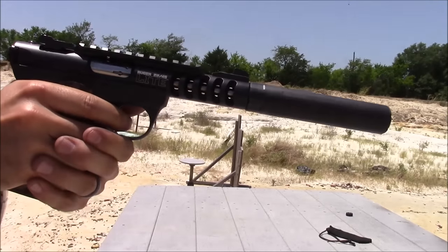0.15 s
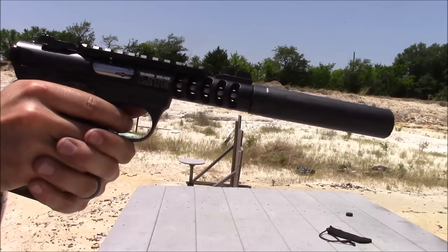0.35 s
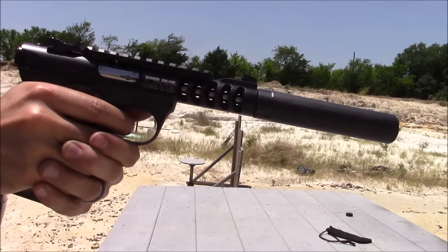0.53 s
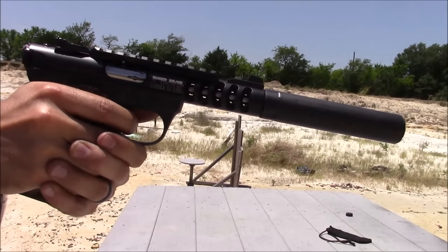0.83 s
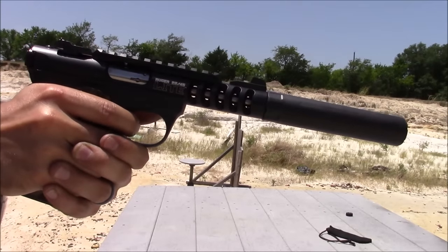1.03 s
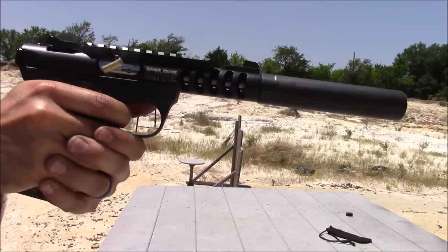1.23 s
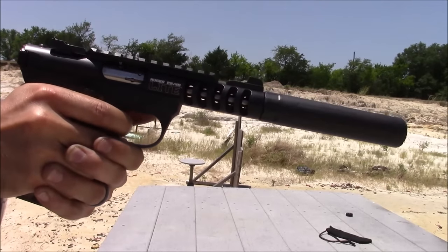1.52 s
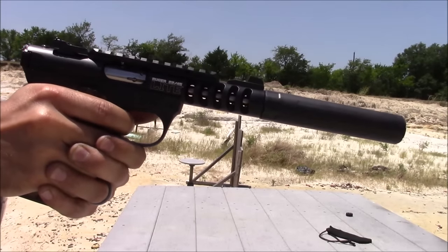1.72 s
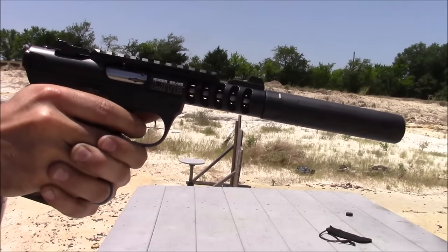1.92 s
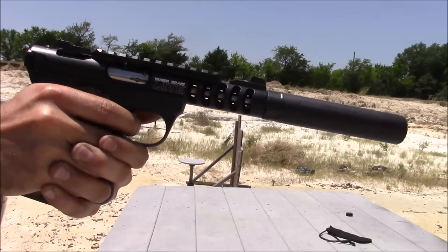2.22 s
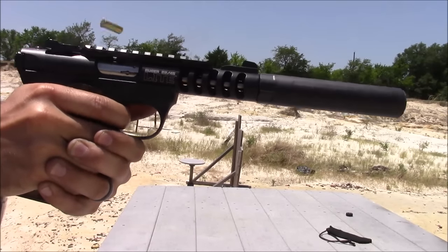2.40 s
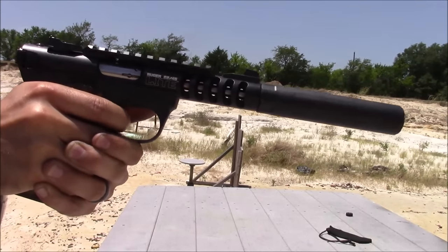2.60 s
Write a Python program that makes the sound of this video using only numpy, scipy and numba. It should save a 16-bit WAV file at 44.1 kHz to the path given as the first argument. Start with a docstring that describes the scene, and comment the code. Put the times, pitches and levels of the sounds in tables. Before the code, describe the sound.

Two suppressed pistol shots about a second apart, each a short muffled crack with metallic bolt clacks, gas hiss and dull echo; cases tick and knock on a wooden bench, wind rumbling on a close microphone.

```python
"""Two muffled pistol shots crack and thump on a windy outdoor range, beside a camera.
Each is a hammer click, a noise blast with low sines, sputtering gas hiss and an echo off the banks.
The bolt's clacks and the spent cases ticking on a wooden bench are struck sets of decaying modes.
One case knocks the camera, a falling wobble and a low thud; scrapes are bursts of resonant noise.
Wind rumble, far and microphone hiss, faint insects and a brief rustle are filtered noise."""
import sys
import numpy as np
from scipy import signal
from scipy.fft import rfft, irfft
from scipy.io import wavfile
from scipy.ndimage import uniform_filter1d
from numba import njit

SR = 44100
rng = np.random.default_rng(int(sys.argv[2]) if len(sys.argv) > 2 else 0)


def makeup_ratio(level_db):
    """Linear amplitude ratio for a level in decibels (20 dB per factor of ten)."""
    decades = np.asarray(level_db, float) / 20
    return 10 ** decades


def file_out(sig):
    """Save sig as 16-bit WAV at sys.argv[1]."""
    # one column per channel
    cols = np.atleast_2d(sig).T
    # limit, then scale
    lim = np.clip(cols, -1, 1)
    pcm = np.round(lim * 32767).astype(np.int16)
    wavfile.write(sys.argv[1], SR, pcm)


N = 121275  # samples, 2.75 s


def colour(x, points):
    """Linear filtering: weight the spectrum of x by (Hz, dB) points joined on a log axis."""
    hz = np.fft.rfftfreq(len(x), 1 / SR) + 1
    points = np.array(points, float)
    gain_db = np.interp(np.log(hz), np.log(points[:, 0]), points[:, 1])
    return irfft(rfft(x) * makeup_ratio(gain_db), len(x))


def noise(points, size):
    """Spectral shaping: white noise filtered to the points and scaled to rms 1."""
    y = colour(rng.standard_normal(size), points)
    return y / np.sqrt(np.mean(y ** 2))


def fade(t, t60):
    """Exponential decay: silent before 0, then 60 dB down every t60 seconds."""
    return (t >= 0) * np.exp(-np.log(1000) * np.maximum(t, 0) / t60)


def add(out, start_s, x):
    """Superposition: mix x into out at start_s."""
    i = int(round(start_s * SR))
    out[i:i + len(x)] += x[:len(out) - i]


def walk(rate):
    """Slow random modulation: levels held 1 / rate s, then smoothed twice; spread near 1."""
    k = int(SR / rate)
    steps = np.repeat(rng.standard_normal(N // k + 1), k)
    return 1.3 * uniform_filter1d(uniform_filter1d(steps, k), k)[:N]


def curve(rows):
    """Amplitude envelope: (s, dB) rows as a gain per sample."""
    return makeup_ratio(np.interp(np.arange(N) / SR, *np.array(rows, float).T))


# Blast spectrum. Each row: frequency in Hz, density in dB per Hz.
BLAST_SPECTRUM = [(290, -19), (500, -3.5), (1320, -9), (2770, -3), (5390, -10), (6610, -7.5), (7980, -15),
                  (13100, -17.5), (16000, -33)]


def muffled_blast(t):
    """Impulsive release: broadband noise held, then decaying, with a tail of sputtering gas."""
    hold_s, t60_s = .004, .04
    gas_db, gas_t60_s = -9, .17
    gas = makeup_ratio(gas_db + 3 * walk(600)[:len(t)]) * fade(t, gas_t60_s)
    body = fade(t - hold_s, t60_s) + (t < hold_s) + gas
    return noise(BLAST_SPECTRUM, len(t)) * body


# Echo spectrum. Each row: frequency in Hz, density in dB per Hz.
ECHO_SPECTRUM = [(88, 8), (150, -7.5), (286, 0.5), (457, -9), (1340, -9.5), (1630, -12), (2700, -8),
                 (8400, -20.5), (16000, -31.5)]


def range_echo(t):
    """Reverberant decay: the treble dies sooner than the bass, so the echo dulls."""
    low_t60_s, high_t60_s = 0.94, 0.55
    echo = noise(ECHO_SPECTRUM, len(t))
    low = colour(echo, [(700, -1), (4000, -61)])
    decaying = low * fade(t, low_t60_s) + (echo - low) * fade(t, high_t60_s)
    return makeup_ratio(3.27 * walk(90)[:len(t)]) * decaying


# The two shots. Each row: start in seconds, blast level in dB before halving, thump level in dB,
# thump frequency in Hz, level of the 330 Hz punch in dB above the thump, echo level in dB.
SHOT_ROWS = [(1.2945, -1, -1, 170, 0, -15), (2.474, -2, 0, 140, -12, -15)]


def shots():
    """Superposition of a shot's parts: hammer fall, blast with gas, low thump and echo."""
    hammer_lead_s, hammer_db, hammer_t60_s = .0045, -17, .05
    thump_lag_s, thump_t60_s, punch_hz = .001, .04, 330
    out, t = np.zeros(N), np.arange(SR) / SR
    for s, blast_db, thump_db, thump_hz, punch_db, echo_db in SHOT_ROWS:
        click = noise([(800, -8), (3000, 3.5), (9000, -19), (14000, -45)], SR)
        add(out, s - hammer_lead_s, makeup_ratio(hammer_db) * click * fade(t, hammer_t60_s))
        add(out, s, makeup_ratio(blast_db) * muffled_blast(t) / 2)
        punch = makeup_ratio(punch_db) * np.sin(2 * np.pi * punch_hz * t)
        thump = np.sin(2 * np.pi * thump_hz * t) + punch
        add(out, s + thump_lag_s, -makeup_ratio(thump_db) * thump * fade(t, thump_t60_s))
        add(out, s, makeup_ratio(echo_db) * range_echo(t))
    return out


def shake(t):
    """Amplitude modulation: noise centred near 150 Hz roughens a ring, growing in over 3 ms."""
    rough = noise([(40, -20), (150, 0), (400, -3), (900, -20), (2000, -60)], len(t))
    return 1 + .9 * np.minimum(t / .003, 1) * rough


def ringing(t, modes, tilt, hz, t60):
    """Modal synthesis: scattered decaying sines plus the blow's own pitch, rms 1 at the onset."""
    scatter_db, own_ring_db = 2, 9
    ring = makeup_ratio(own_ring_db) * np.sin(2 * np.pi * hz * t) * fade(t, 0.7 * t60) * shake(t)
    for mode_hz, mode_db, ratio in np.array(modes, float):
        level, detune, sign = rng.standard_normal(3)
        gain = makeup_ratio(mode_db + tilt(mode_hz) + scatter_db * level)
        phase = 2 * np.pi * mode_hz * (1 + 0.018 * detune) * t + np.pi * (sign > 0)
        ring = ring + gain * np.sin(phase) * fade(t, ratio * t60) * shake(t)
    return ring / np.sqrt(np.mean(ring[:66] ** 2))  # first 1.5 ms


def clacks(rows, modes, top_hz):
    """Impact excitation: modes ring with a crack, a duller rattle and a bounce off the ground."""
    crack_db, rattle_db, rattle_top_hz = 0, -8, 4000
    ground_lag_s, ground_db = .0056, -8
    out, t = np.zeros(N), np.arange(8192) / SR
    grid = 200 * 2 ** np.arange(0, 6.6, .25)  # Hz
    for s, db, hz, spread, t60 in rows:
        def tilt(f):
            return -6 * (np.log2(f / hz) / spread) ** 2  # dB, loudest at the brightest pitch

        ring = ringing(t, modes, tilt, hz, t60)
        crack_shape = tilt(grid) / 2 - 20 * np.log10(1 + (grid / top_hz) ** 2)
        crack = noise(np.c_[grid, crack_shape], len(t)) * fade(t, .009)
        rattle_shape = tilt(grid) / 2 - 20 * np.log10(1 + (grid / rattle_top_hz) ** 3)
        rattle = noise(np.c_[grid, rattle_shape], len(t)) * fade(t, 2.1 * t60)
        blow = ring + makeup_ratio(crack_db) * crack + makeup_ratio(rattle_db) * rattle
        add(out, s, makeup_ratio(db) * blow / 2)
        add(out, s + ground_lag_s, makeup_ratio(db + ground_db) * blow / 2)
    return out


# Clacks of the pistol's action. Each row: start in seconds, level in dB before halving,
# brightest pitch in Hz, spread in octaves, reference t60 in seconds.
ACTION_BLOWS = [(1.293, -10.5, 9200, 0.58, 0.017), (1.328, -3, 2760, 1.8, .02),
                (1.339, -27.5, 2500, 1., .025), (1.3664, -2, 1338, 2.6, 0.045),
                (2.4725, -10.5, 9700, 1., .015), (2.482, -7, 1980, 1.6, 0.031),
                (2.498, -4, 2500, 1.8, 0.0067), (2.528, -20, 3950, 1., .04), (2.547, -14.5, 1920, .8, .03),
                (2.5595, -6.5, 1300, 1.26, 0.005)]
# Modes of the action. Each row: frequency in Hz, level in dB, t60 relative to the clack (ratio).
ACTION_RESONANCES = [(900, -4, .8), (1380, 0, 1.), (2050, 1, .8), (2650, 1, .8), (3700, 0, .6),
                     (4300, 0, .6), (6400, -4, .35), (9400, 0, .3), (11700, -3, .3)]


def action():
    """Forced impact of metal parts: the bolt clacks with bright, quickly damped modes."""
    return clacks(ACTION_BLOWS, ACTION_RESONANCES, top_hz=16000)


# Spent cases and grit landing on the bench. Each row: start in seconds, level in dB before halving,
# brightest pitch in Hz, spread in octaves, reference t60 in seconds.
BENCH_BLOWS = [(.1285, -30, 1294, 1.4, 0.043), (.3786, -39, 3000, 1.1, 0.027),
               (.5078, -14, 4135, 1.8, 0.024), (.5862, -35.5, 2430, 0.6, .03),
               (.6525, -28, 1470, 1.1, 0.016), (.7199, -34, 2014, 0.83, 0.039), (.86, -36.5, 3200, 1, .03),
               (.885, -34.5, 1100, 0.77, 0.044), (1.0716, -29.5, 3140, 0.86, 0.011),
               (1.113, -37.5, 1830, 0.54, 0.022), (1.2432, -39.5, 4000, 1.1, .03),
               (1.7844, -42.5, 3500, 1.2, 0.038), (1.9571, -12.5, 4770, 1.8, 0.014),
               (1.9905, -38, 4500, 0.65, .03), (2.0947, -34, 2330, .9, 0.037),
               (2.1167, -22.5, 2770, 1.6, 0.046), (2.1636, 0, 1149, 2.01, 0.04),
               (2.2589, -39.5, 3000, 1.2, 0.038), (2.3866, -9, 3766, 1.8, 0.039),
               (2.4235, -11.5, 1940, 1, 0.017), (2.442, -27, 2030, 1., 0.047)]
# Modes of the bench. Each row: frequency in Hz, level in dB, t60 relative to the tick (ratio).
BENCH_RESONANCES = [(260, 0, 1.3), (550, 2, 1.2), (900, 0, .8), (1400, 4, 1.), (1750, 0, .9), (2250, 0, .9),
                    (2800, -1, .8), (3400, 0, .9), (4150, 1, .9), (4850, 0, .7), (6100, -5, .6),
                    (7800, -10, .5), (10500, -7, .5), (13000, -12, .4)]


def bench():
    """Modal response of wood: each tick excites a dense set of modes with a duller crack."""
    return clacks(BENCH_BLOWS, BENCH_RESONANCES, top_hz=6950)


def knock():
    """Transient response: a case on the camera makes a hard wobble falling in pitch, then a slow rebound."""
    start_s, level_db, length_s = 1.5993, 27, 1.6 / 290
    out, t = np.zeros(N), np.arange(4096) / SR
    u = np.clip(t / length_s, 0, 1)
    swell = np.minimum(u / .3, 1) ** 3 * (1 - u) ** 2
    wobble = np.sin(3 * np.pi * u ** .92) * swell + .05 * np.sin(3 * np.pi * u)
    late = t - length_s
    rebound = np.sin(2 * np.pi * 65 * late) + .3 * np.sin(2 * np.pi * 330 * late)
    add(out, start_s, makeup_ratio(level_db) * (wobble - .085 * rebound * fade(late, .05)))
    return out


# Short scrapes of metal after a shot. Each row: start in seconds, length in seconds, level in dB,
# centre in Hz, treble level in dB relative to the centre.
SCRAPE_ROWS = [(1.428, 0.0093, -27.5, 3880, -12.5), (1.452, 0.0089, -29.5, 3550, -22),
               (1.473, 0.0034, -39, 3030, -10), (2.611, 0.0068, -30, 6300, -7),
               (2.658, 0.075, -49, 11400, -2)]


def scrapes():
    """Frictional excitation: bursts of resonant noise swell quickly, hold and trail off."""
    out, t = np.zeros(N), np.arange(8192) / SR
    for s, length, db, hz, treble_db in SCRAPE_ROWS:
        shape = [(0.61 * hz, -22), (0.82 * hz, -9), (hz, 0),
                 (1.12 * hz, treble_db), (17000, treble_db - 11)]
        swell = np.minimum(t / length * 4, 1)
        trail = np.where(t < length, 1, fade(t - length, 0.036))
        add(out, s, makeup_ratio(db) * noise(shape, len(t)) * swell * trail)
    return out


# Low rumble level: wind swells, and at 1.6 s the low thud of the knock on the camera.
# Each row: time in seconds, level in dB before the noise's own swings are partly evened.
RUMBLE_LEVEL = [(0.0, -18), (0.05, -6.5), (0.18, -16), (0.36, -22), (0.45, -13.5), (0.76, -15.5),
                (0.89, -8), (0.93, -17.5), (1.14, -13.5), (1.27, -16), (1.32, -24.5), (1.57, -26.5),
                (1.6, -13.5), (1.68, -28), (1.79, -12), (2.17, -24), (2.21, -15.5), (2.24, -30),
                (2.31, -22), (2.35, -35), (2.62, -31), (2.75, -30)]
# Rumble spectrum. Each row: frequency in Hz, density in dB per Hz.
RUMBLE_SPECTRUM = [(12, -3), (20, -20), (75, -2), (94, -11), (125, -23), (192, -33), (222, -42),
                   (256, -40.5), (363, -39), (900, -54.5), (1170, -50), (1980, -120)]
# Upper rumble. Each row: time in seconds, level in dB.
UPPER_RUMBLE_LEVEL = [(0.0, -35), (0.56, -32.5), (0.79, -34.5), (1.27, -33.5), (1.57, -45.5), (1.68, -38),
                      (1.93, -33), (2.04, -33.5), (2.3, -35), (2.6, -33), (2.69, -43), (2.75, -29)]


def low_rumble():
    """Turbulent pressure on the microphone: low noise swells, with the knock's thud among the swells."""
    rumble = noise(RUMBLE_SPECTRUM + [(3000, -120)], N)
    power = uniform_filter1d(rumble ** 2, 4000)
    rumble = rumble / power ** .25 * curve(RUMBLE_LEVEL)  # partly evens the noise's own swings
    upper = noise([(80, -38), (150, 11), (300, -3), (800, -27), (2000, -42)], N)
    return rumble + makeup_ratio(2 * walk(17)) * upper * curve(UPPER_RUMBLE_LEVEL)


# Spectrum of the far and microphone hiss. Each row: frequency in Hz, density in dB per Hz.
HISS_SPECTRUM = [(240, -41), (400, -2), (636, -5), (879, -8.5), (1160, -9), (1560, -14), (3260, -18),
                 (5190, -23.5), (16000, -39)]
# Far noise below a crossover at 4 to 7 kHz. Each row: time in seconds, level in dB above its mean.
FAR_LEVEL = [(0, -1.5), (.12, -1), (.2, 0), (1.2, -0.5), (1.7, -7), (1.8, -6.5), (1.88, -8), (2.0, -4),
             (2.3, -4), (2.75, 4.5)]
# Microphone hiss above the crossover. Each row: time in seconds, level in dB relative to the same mean.
MICROPHONE_LEVEL = [(0, -3.5), (1.2, -3), (1.6, -40), (1.75, -4), (1.9, -9), (2.05, -5.5), (2.35, -17.5),
                    (2.75, 8)]


def far_and_microphone_hiss():
    """Band splitting: far noise below the crossover, microphone hiss above it with its own level."""
    hiss = noise(HISS_SPECTRUM, N)
    far = colour(hiss, [(4000, 0), (7000, -30)])
    microphone = (hiss - far) * curve(MICROPHONE_LEVEL)
    return makeup_ratio(-43.5) * (makeup_ratio(2.03 * walk(25.48)) * far * curve(FAR_LEVEL) + microphone)


def insects():
    """Narrow-band noise: a faint wavering band around one pitch."""
    hz, level_db = 3500, -61.5
    band = noise([(0.82 * hz, -40), (hz, 0), (1.3 * hz, -40)], N)
    return makeup_ratio(level_db + 2 * walk(13)) * band


def rustle():
    """Gaussian envelope: one brief swell of band noise."""
    centre_s, length_s, hz, level_db = 1.885, 0.056, 3280, -46.5
    shape = [(1000, -50), (0.4 * hz, -20), (hz, 0), (1.8 * hz, -16), (2 * hz, -9), (10000, -30)]
    swell = np.exp(-((np.arange(N) / SR - centre_s) / length_s) ** 2)
    return makeup_ratio(level_db) * noise(shape, N) * swell


def channel_hiss():
    """Uncorrelated noise: each of two channels has its own faint hiss."""
    shape = [(100, 13), (1000, 0.5), (8000, -1), (16000, -9.5), (17000, -43)]
    return makeup_ratio(-61) * np.array([noise(shape, N) for _ in range(2)])


def scene():
    """Superposition: both channels carry the same sources, each with its own hiss."""
    sources = shots() + action() + bench() + knock() + scrapes()
    background = low_rumble() + far_and_microphone_hiss() + insects() + rustle()
    return sources + background + channel_hiss()


@njit
def follow(x, up, down):
    """Envelope detection: a peak follower with separate rise and fall."""
    e, y = 0., np.empty(len(x))
    for i in range(len(x)):
        e += (abs(x[i]) - e) * (up if abs(x[i]) > e else down)
        y[i] = e
    return y


def band_limit(x):
    """A steep low-pass at the top of the band."""
    return signal.sosfilt(signal.butter(12, 16410, fs=SR, output="sos"), x)


def record(dry):
    """Dynamic compression: gain ducks just after overloads, which clip softly; the top is cut."""
    top_db, attack_s, release_s = -7, .003, .03
    envelope = follow(dry.mean(axis=0), 1 / (attack_s * SR), 1 / (release_s * SR))
    gain = np.minimum(1, makeup_ratio(top_db) / (envelope + 1e-9))
    low_cut = signal.butter(1, 11.8, "high", fs=SR, output="sos")
    ducked = signal.sosfilt(low_cut, dry) * np.roll(gain, 200)  # the gain lags 4.5 ms
    clipped = .95 * ducked / (1 + np.abs(ducked) ** 8) ** .125  # rounded shoulder
    top_cut = signal.butter(12, 16300, fs=SR, output="sos")
    mix = signal.sosfiltfilt(top_cut, clipped)
    return band_limit(mix)


dry = scene()
out = record(dry)
file_out(out)
```